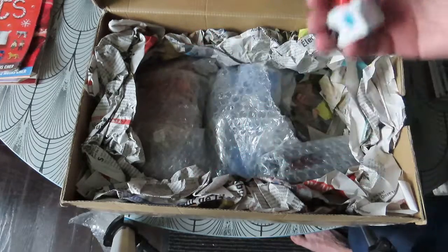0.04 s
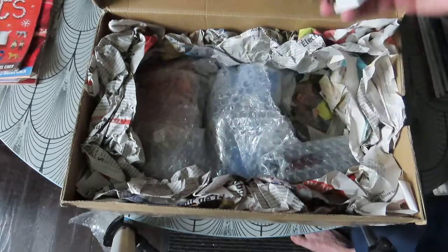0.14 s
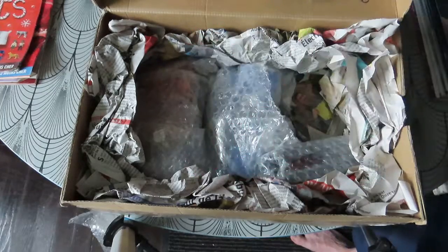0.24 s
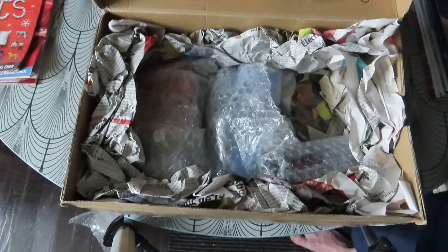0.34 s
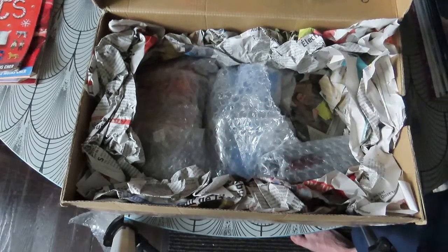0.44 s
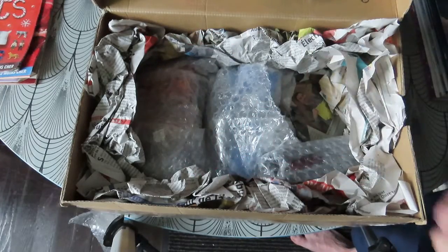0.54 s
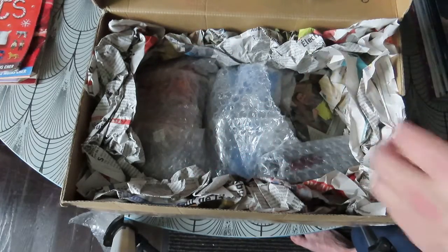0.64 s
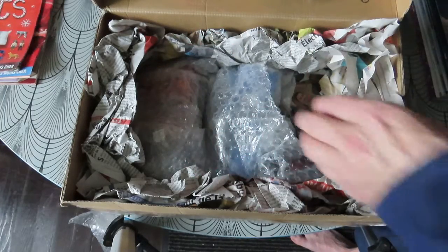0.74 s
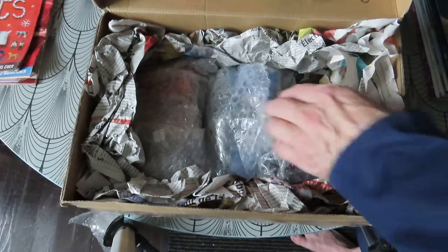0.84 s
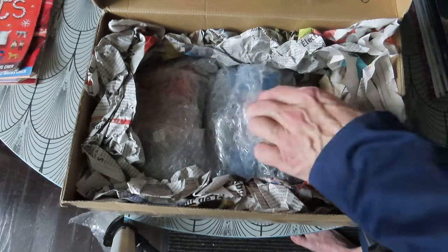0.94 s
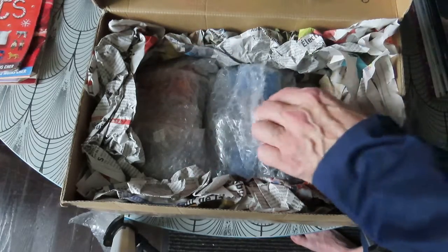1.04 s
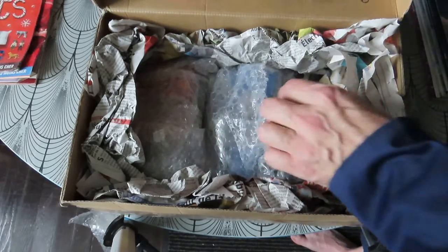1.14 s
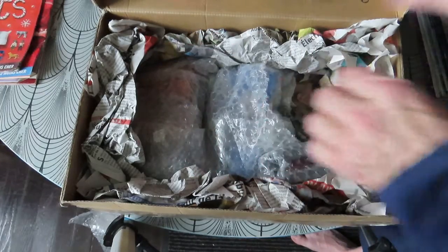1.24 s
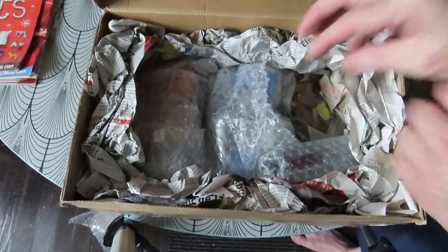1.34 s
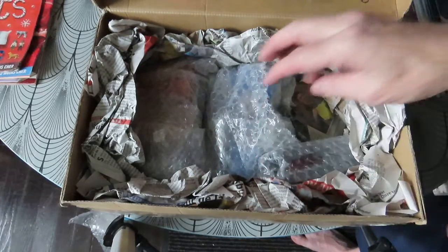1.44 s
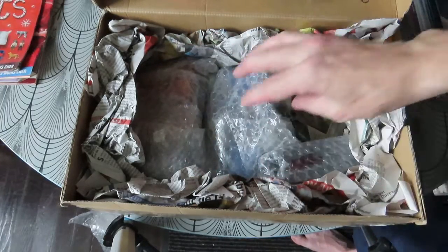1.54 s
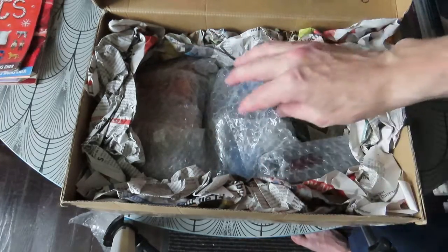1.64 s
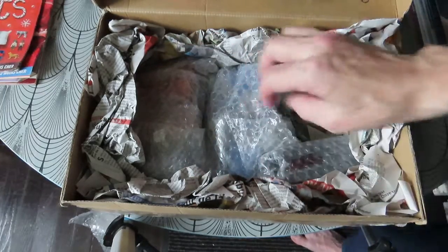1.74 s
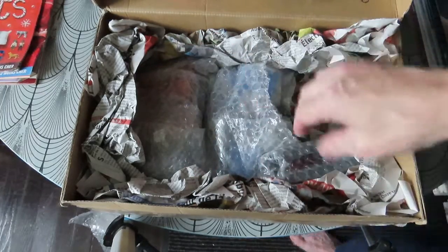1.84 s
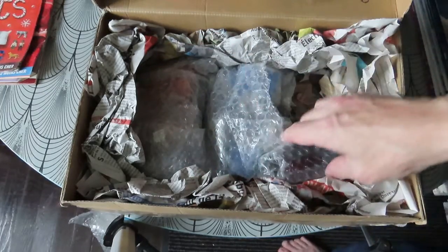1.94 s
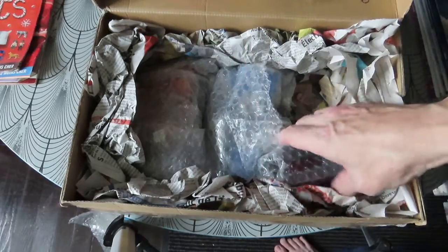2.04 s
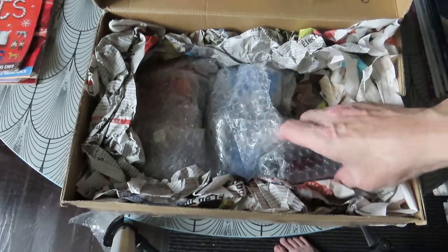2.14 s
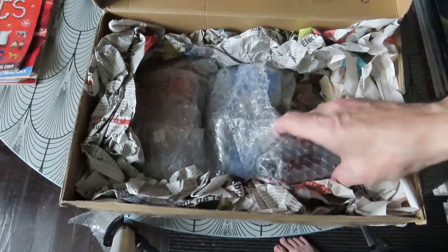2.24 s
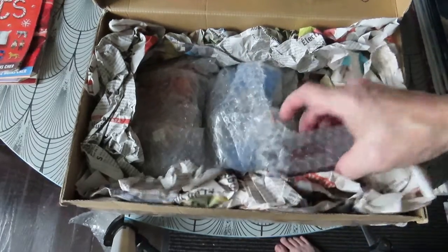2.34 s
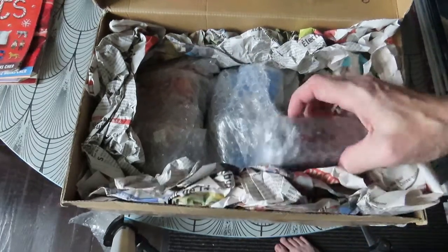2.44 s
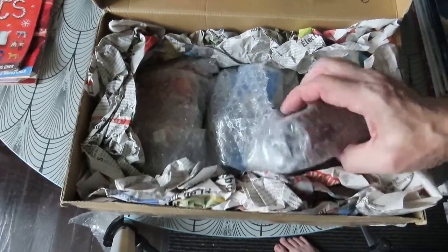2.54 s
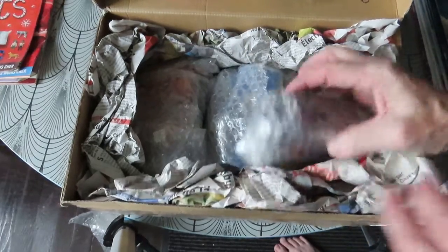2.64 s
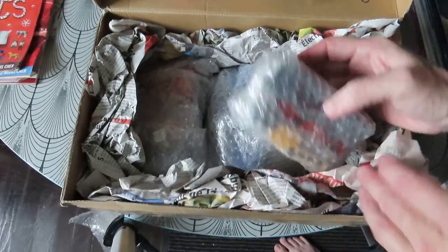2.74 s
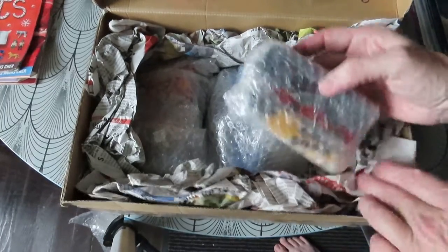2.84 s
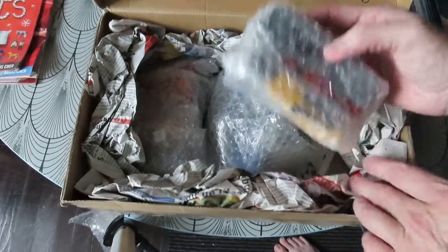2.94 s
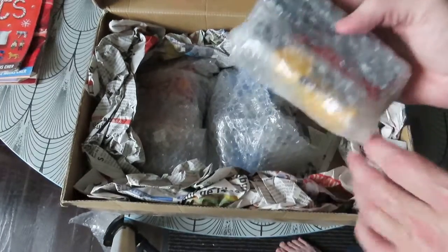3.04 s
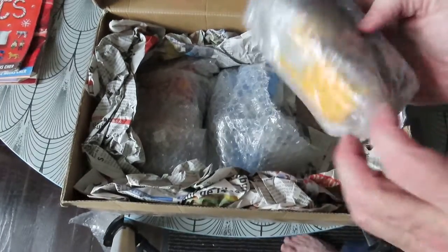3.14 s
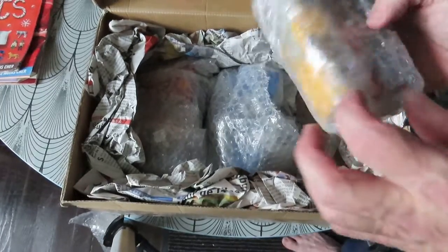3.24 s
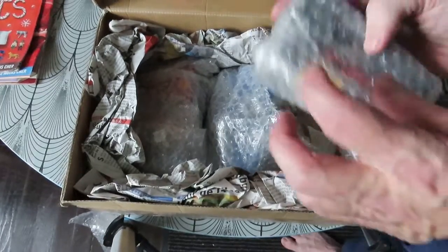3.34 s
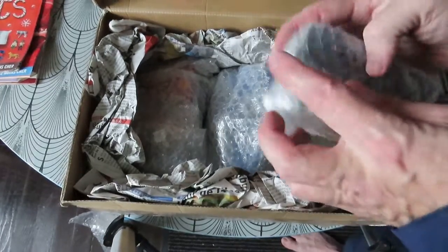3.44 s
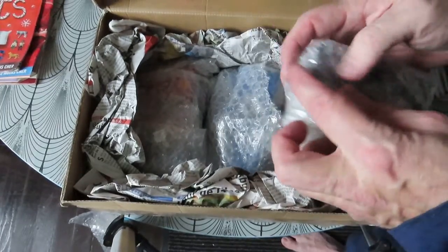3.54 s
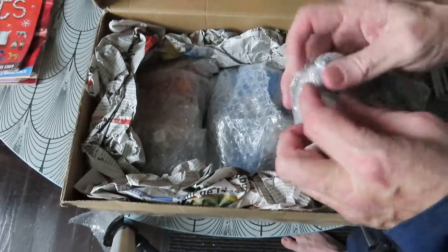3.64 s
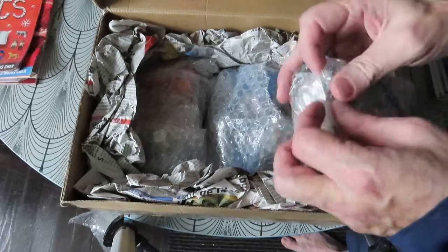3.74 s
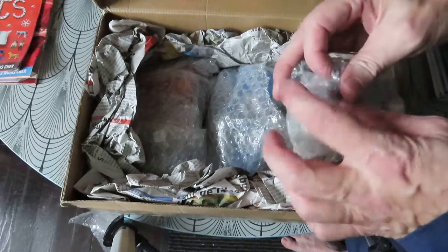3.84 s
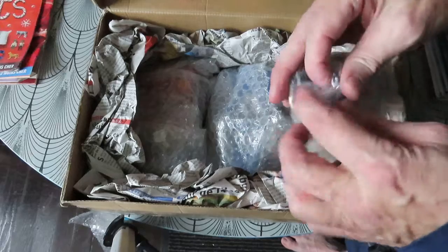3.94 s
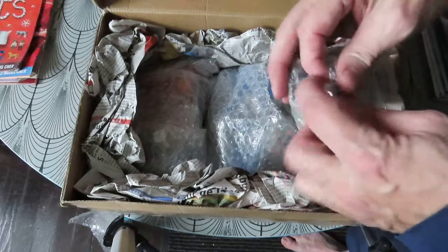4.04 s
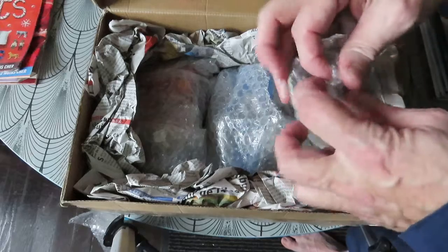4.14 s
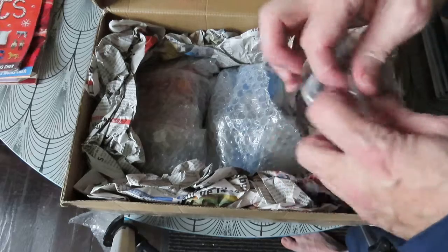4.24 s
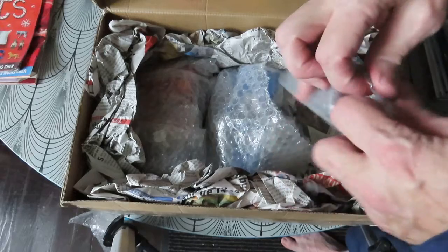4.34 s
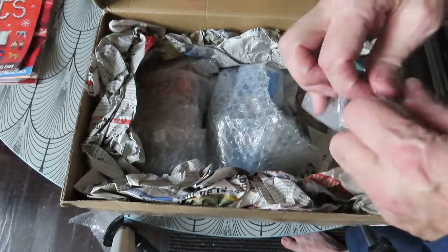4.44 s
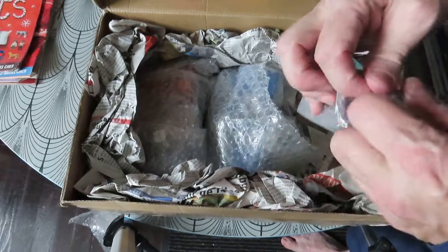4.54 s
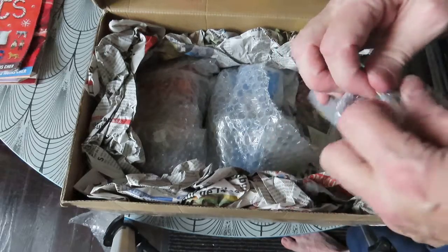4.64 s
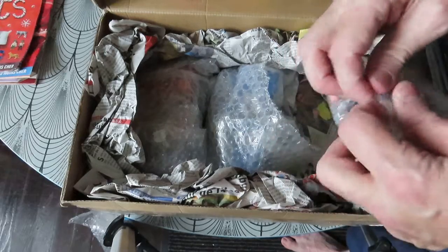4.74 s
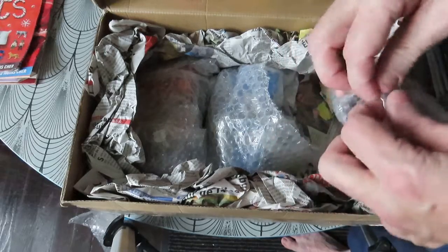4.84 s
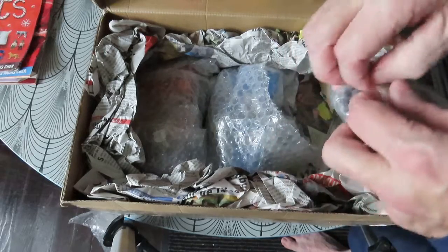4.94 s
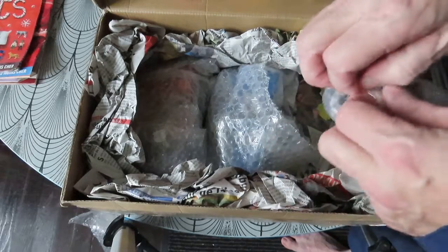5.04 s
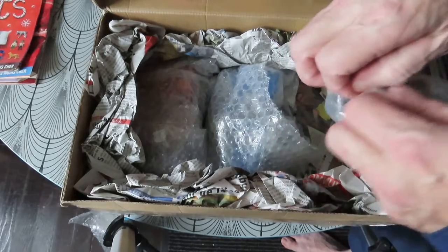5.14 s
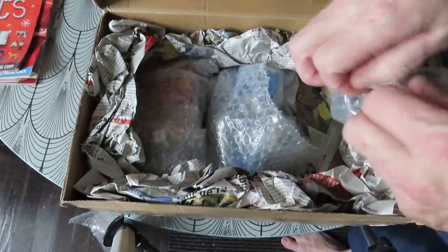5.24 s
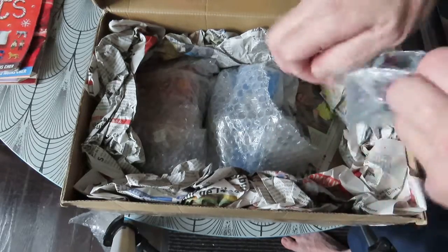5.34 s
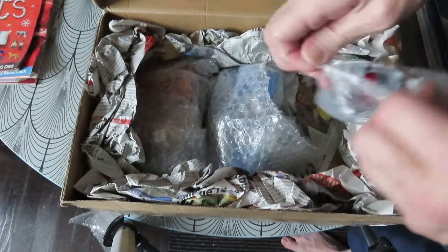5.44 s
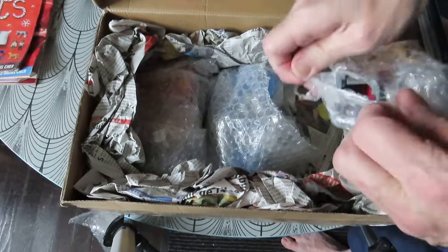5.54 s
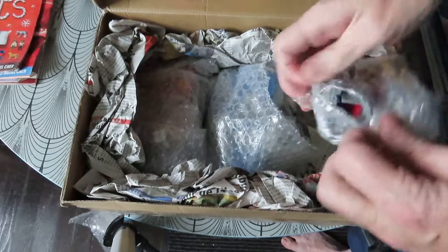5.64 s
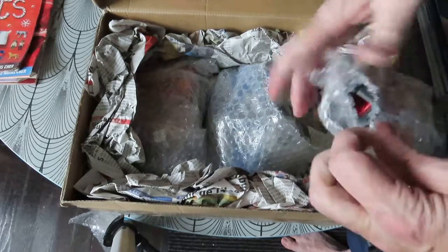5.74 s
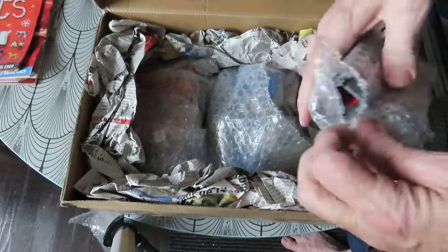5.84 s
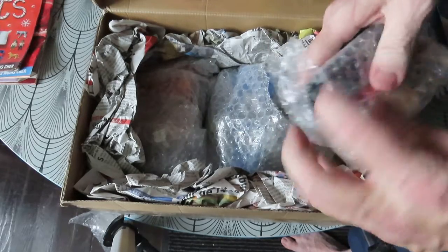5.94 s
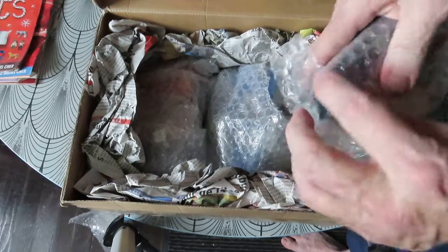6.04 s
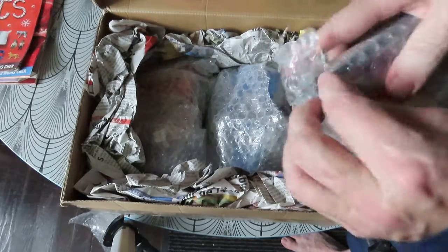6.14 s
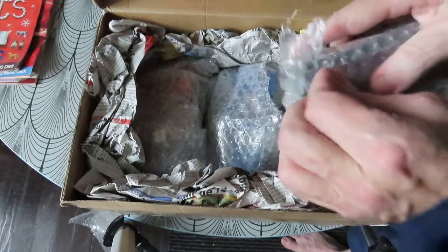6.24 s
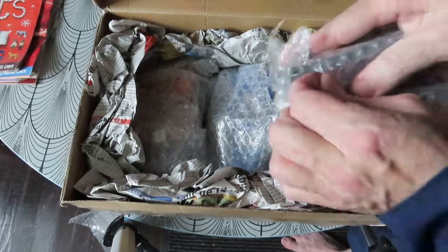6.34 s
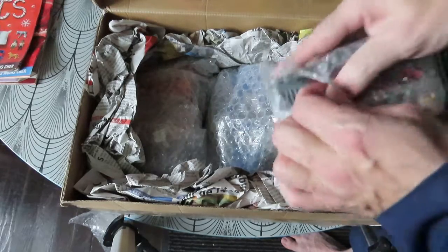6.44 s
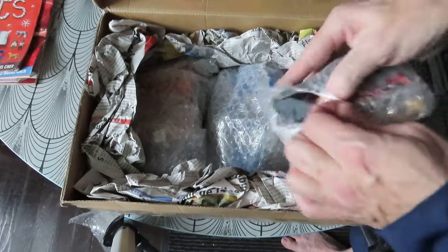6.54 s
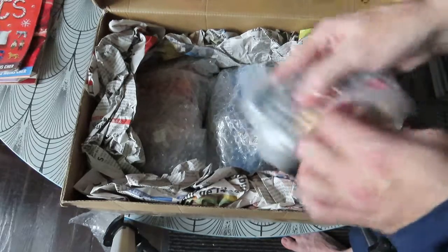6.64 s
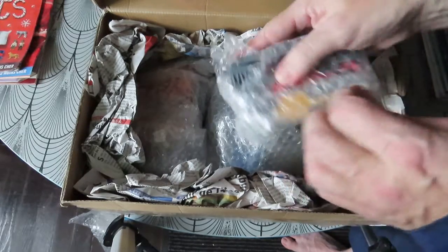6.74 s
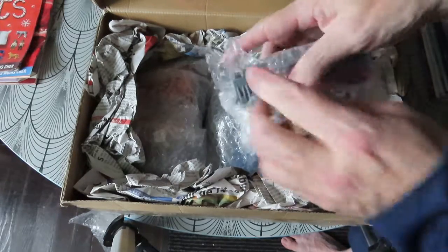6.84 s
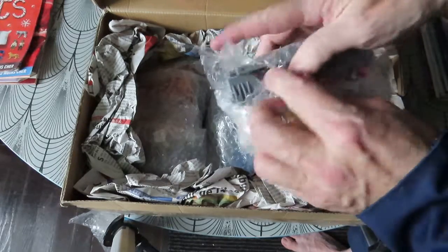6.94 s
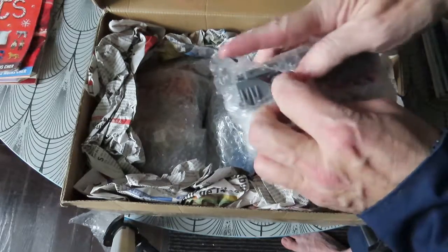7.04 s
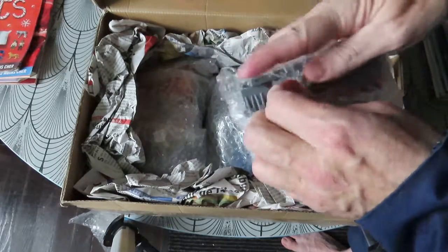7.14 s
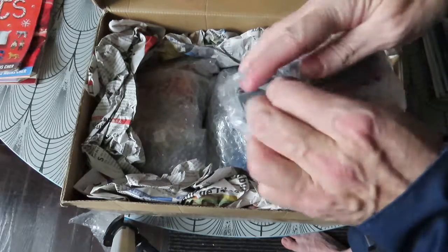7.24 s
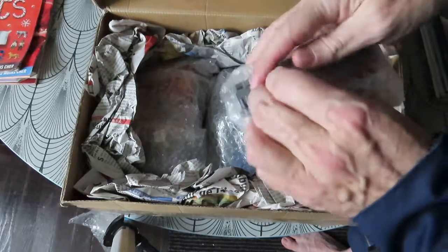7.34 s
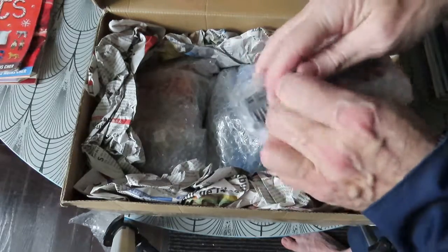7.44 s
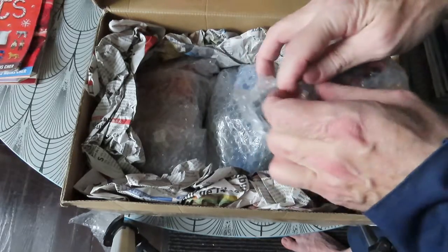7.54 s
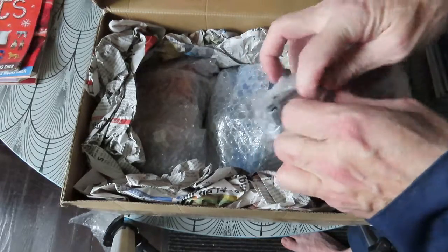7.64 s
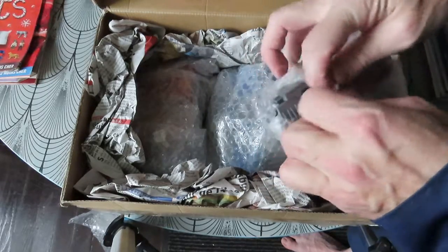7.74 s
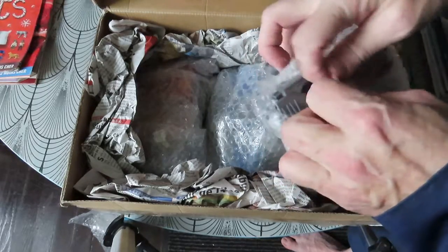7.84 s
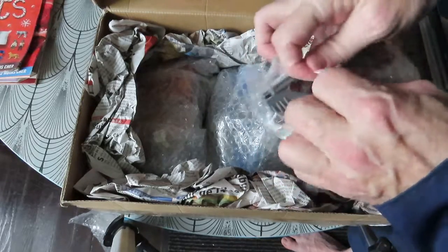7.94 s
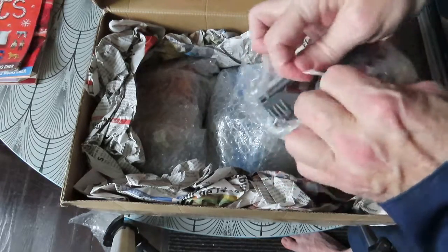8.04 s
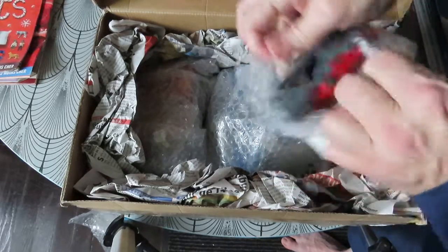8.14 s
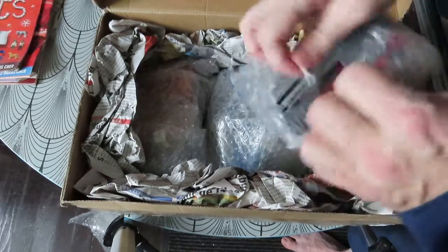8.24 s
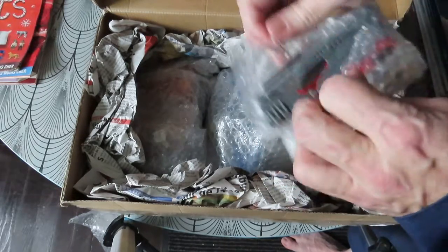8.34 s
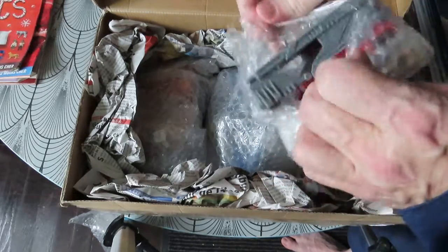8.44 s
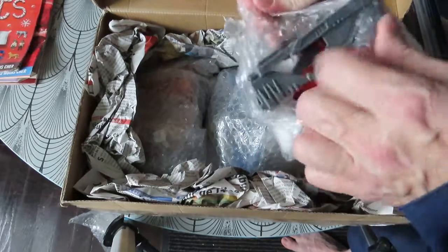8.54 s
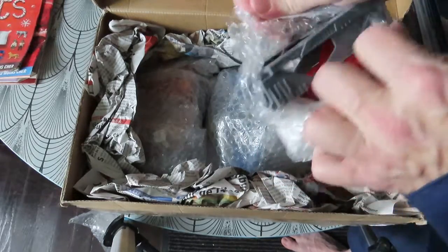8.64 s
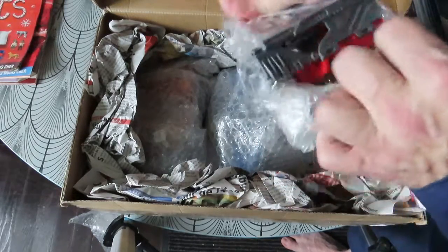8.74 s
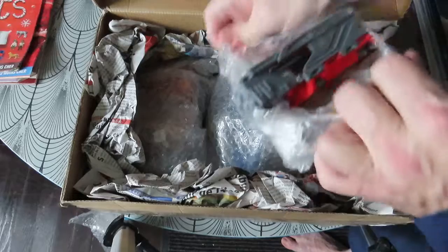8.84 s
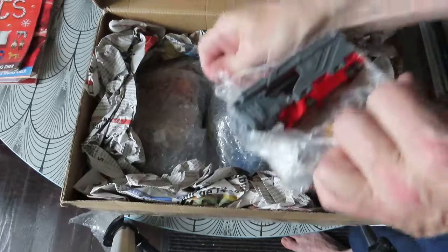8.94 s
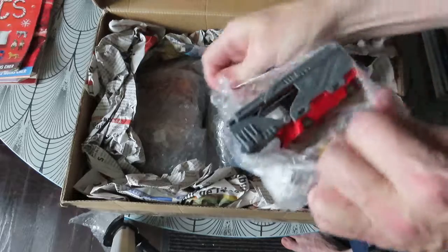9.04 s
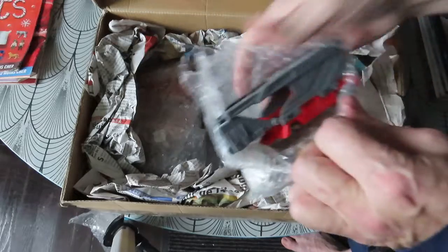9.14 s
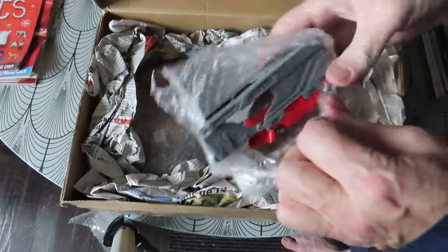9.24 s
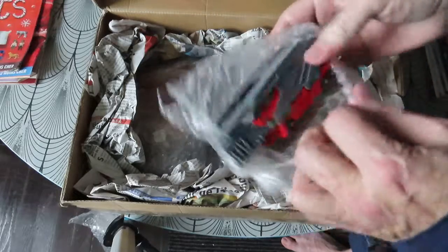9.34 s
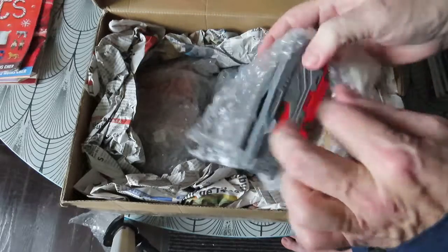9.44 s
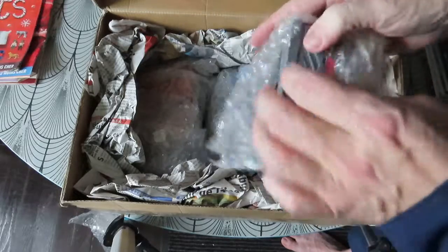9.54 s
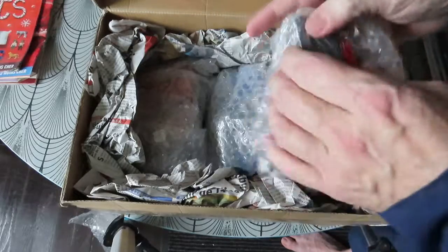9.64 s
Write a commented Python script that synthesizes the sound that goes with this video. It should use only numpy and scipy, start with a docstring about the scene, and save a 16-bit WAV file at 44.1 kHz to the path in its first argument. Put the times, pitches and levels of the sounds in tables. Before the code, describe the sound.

A quiet room hums faintly behind close stereo microphones. From 0.15 to 0.5 s small hard plastic parts clink lightly. At 0.7 to 0.85 s a toy drops on a table: loud, hollow double knocks with sharp clacks, then a brief rustle until about 1.1 s. Near silence follows, with faint ticks around 1.3 s. From 2 s hands dig into paper and bubble wrap, crunching with dull box bumps, strongest at 2.4 to 2.9 s. From 3 to 5 s the parcel is squeezed and picked at in small uneven crackles. At 5.2 s a bubble pops sharply with a hissy puff, and a heavy crunch follows at 5.37 s. Crisp pulls come at 6.4 to 6.7 s, then softer fiddling. Around 8.1 to 8.2 s a cluster of loud snaps and a thump tears the wrap, another bright crack comes at 8.78 s, and rustling continues to the end at almost 10 s.

```python
"""Crumpled paper and bubble wrap rustle and snap as hands dig a parcel out of a box and tear its wrap open.
The rustle is thousands of tiny noise ticks in clumps over a hiss; it swells with squeezes, pulls and impacts.
Snaps ring briefly and crackle, knocks on table, box and parcel are dull low rings, a puff follows one burst.
At the start a toy is dropped on a table and small plastic parts clink: a tick plus a few ringing notes.
A quiet room hums behind; two close microphones stand a little to the left of the hands."""
import sys
import numpy as np
from scipy import signal
from scipy.fft import rfft, irfft
from scipy.io import wavfile
from scipy.ndimage import uniform_filter1d

SR = 44100
rng = np.random.default_rng(int(sys.argv[2]) if len(sys.argv) > 2 else 0)


def wav_out(sig):
    """Save sig, one row per channel (or a flat mono array), as 16-bit PCM at SR to the path in sys.argv[1]."""
    wavfile.write(sys.argv[1], SR, np.round(np.clip(np.atleast_2d(sig).T, -1, 1) * 32767).astype(np.int16))


N = 427769


def gain_of(db):
    """Turns decibels into a factor."""
    return 10 ** (np.asarray(db) / 20)


def evened(x):
    """Scales to an average strength (rms) of 1."""
    return x / np.sqrt(np.mean(x ** 2) + 1e-20)


def smoothed_twice(x, size, axis=-1):
    """A moving average of one width, applied twice."""
    return uniform_filter1d(uniform_filter1d(x, size=size, axis=axis), size=size, axis=axis)


def read(points, hz):
    """Reads a table between its points, on a log-frequency axis."""
    f, value = np.transpose(points)
    return np.interp(np.log(hz + 1), np.log(f + 1), value)


def add(mix, start_s, sound, pan_db, lag):
    """Places a sound; positive pan favours the left, which gets it lag samples later."""
    for channel, side, late in ((mix[0], .5, lag), (mix[1], -.5, 0)):
        part = channel[round(start_s * SR) + late:][:len(sound)]
        part += gain_of(side * pan_db) * sound[:len(part)]


def ring(hz, t60, rise_s):
    """A vibration that starts softly and fades 60 dB in t60 seconds (at least 2 ms), peak 1."""
    t60 = max(t60, .002)
    t = np.arange(round(t60 * SR)) / SR
    fade = gain_of(-60 * t / t60)
    x = np.sin(2 * np.pi * hz * t) * fade * (1 - np.exp(-t / rise_s))
    return x / abs(x).max()


def crack(noise, decay_s, low_hz, high_hz):
    """A short burst of noise, kept to a band of pitches, peak 1."""
    x = noise * np.exp(-np.arange(len(noise)) / SR / decay_s)
    x = signal.lfilter(*signal.butter(2, [low_hz, high_hz], "band", fs=SR), x)
    return x / abs(x).max()


# balance of pitches in the room noise: (frequency [Hz], relative level per Hz [dB])
AIR_COLOUR = [(12, -28), (20, 4), (53, -4.5), (107, 0), (388, -6), (434, 0.5), (485, -7), (558, -3),
              (660, -23), (802, -20), (897, -5.5), (1090, -14), (3950, -21), (13500, -41.5), (16000, -40)]
AIR_DB = -49  # strength of this noise, without the tones
# fuzzy tones in the room: (frequency [Hz], width [Hz], level [dB])
ROOM_TONES = [(555, 13, -61.5), (896, 53, -60.5), (350, 28, -65), (689, 58, -58)]
# how alike left and right are: (frequency [Hz], likeness [0 to 1])
AIR_LIKENESS = [(60, 1), (180, 0.089), (550, 0.53), (1650, 0.24), (4970, 0.46), (15000, 0.34)]


def air():
    """The steady noise of the room: random noise shaped by pitch, with a few fuzzy tones."""
    frames, hz = N // 512 + 5, np.fft.rfftfreq(2048, 1 / SR)
    a, b, c, d = rng.standard_normal((frames, 1025, 4)).T
    left, other = a + 1j * b, c + 1j * d
    same = np.clip(read(AIR_LIKENESS, hz), -1, 1)[:, None]
    z = np.array([left, same * left + np.sqrt(1 - same ** 2) * other])
    wash = gain_of(read(AIR_COLOUR, hz))
    wash *= gain_of(AIR_DB) / np.linalg.norm(wash)
    for tone_hz, width_hz, db in ROOM_TONES:
        bump = np.exp(-((hz - tone_hz) / width_hz) ** 2)
        wash = np.hypot(wash, gain_of(db) * bump / np.linalg.norm(bump))
    # the deep rumble comes and goes
    surge = evened(uniform_filter1d(rng.standard_normal(frames), size=25))
    surge_share = read([(60, 0.61), (200, 0.027)], hz)[:, None]
    z *= gain_of(3.1 * surge * surge_share)
    x = signal.istft(z * wash[:, None], nperseg=2048, noverlap=1536)[1][:, :N]
    return np.linalg.norm(wash) * evened(x)


def rustle(per_s=1100, spread_db=3.5, clump_db=1.5, decay_s=0.0021, hump_db=14.5, lag_spread=0.85, rub=0.68):
    """Countless creases of random size and colour give way in clumps over a rubbing hiss."""
    kinds = 24  # kinds of crease, each with its own colour
    place, size, kind, lag = rng.random((round(per_s * N / SR), 4)).T
    clumps = evened(smoothed_twice(rng.standard_normal(N), 500))
    at = (place * (N - 20)).astype(int) + 10
    rarity = np.minimum(-np.log(size + 1e-9), 5)  # many small creases, few big ones
    size = gain_of(spread_db * rarity + clump_db * clumps[at])
    lag = np.round(lag_spread * np.sqrt(12) * (lag - .5)).astype(int)  # samples: creases lie left and right
    hz, t, out = np.fft.rfftfreq(512, 1 / SR), np.arange(512) / SR, np.zeros((2, N))
    for k, centre_hz in enumerate(np.geomspace(300, 12000, kinds)):
        # finer creases make shorter ticks
        burst = rng.standard_normal(512) * np.exp(-t / decay_s * (centre_hz / 3000) ** 0.82)
        hump = gain_of(hump_db * np.exp(-np.log2((hz + 1) / centre_hz) ** 2))
        burst = irfft(rfft(np.roll(burst, 64)) * hump)
        mine, train = (kind * kinds).astype(int) == k, np.zeros((2, N))
        np.add.at(train[0], at[mine] + lag[mine], size[mine])
        np.add.at(train[1], at[mine], size[mine])
        out += signal.oaconvolve(train, evened(burst)[None], axes=1)[:, 64:N + 64]
    hiss = rng.standard_normal((3, N))  # one shared, plus a little for each side
    hiss = (hiss[0] + 0.12 * hiss[1:]) * gain_of(.5 * clump_db * clumps)
    return evened(out) + rub * evened(hiss)


# slow level of the rustle between swells: (time [s], middle [dB], low end [dB], treble [dB])
SLOW_LEVEL = [(0.0, -61, -54, -66), (0.66, -63.5, -59, -66), (0.9, -40.5, -45, -42),
              (1.18, -47.5, -47, -53), (1.3, -64.5, -60, -65), (1.91, -62.5, -64, -67),
              (1.96, -46.5, -47, -53), (2.4, -39, -43, -47.5), (2.95, -41.5, -42, -47.5),
              (3.09, -52, -51, -55), (3.42, -49.5, -49, -52), (3.75, -45, -49, -47),
              (4.2, -40.5, -57, -45.5), (4.6, -51, -60, -51), (5.15, -53.5, -62, -53), (5.6, -54, -50, -59),
              (6.3, -46.5, -55, -47.5), (6.85, -51.5, -61, -53), (7.5, -48, -57, -49),
              (8.0, -49, -54, -44.5), (8.3, -39.5, -45.5, -38), (8.6, -44, -58, -46.5),
              (9.0, -51, -69, -46), (9.24, -46.5, -62, -50), (9.4, -40.5, -46.5, -42), (9.7, -40, -44, -49)]
# swells of rustle from squeezes, pulls and impacts; fades below 0.01 s count as 0.01 s:
# (peak time [s], time to fade 20 dB [s], effort [dB], weight on box and parcel [dB],
# crispness of the film [dB])
SWELLS = [(0.725, .04, -38, -33, -56), (0.77, 0, -51, -37, -60), (0.833, 0.03, -30.5, -36, -57),
          (0.98, 0.3, -44.5, -39.5, -40), (1.84, -0.03, -50, -39, -73), (1.99, 0.05, -43, -36, -39),
          (2.11, 0.23, -38, -43, -39.5), (2.419, 0.2253, -32.5, -31, -41.5), (2.56, -0.04, -54, -36, -49),
          (2.63, .15, -34.5, -27, -55), (2.71, 0.06, -40, -40, -40), (2.879, .17, -30.5, -28.5, -36),
          (3.02, -0.24, -47, -39, -41), (3.14, 0.2, -45, -44, -44), (3.25, 0.15, -38.5, -47, -41),
          (3.31, 0.1, -45, -62, -46), (3.588, 0.2, -37.5, -43, -37), (3.72, 0.2, -42, -39, -44),
          (3.8, 0.17, -46, -49, -44), (3.87, 0.13, -42.5, -45, -48), (3.95, 0.17, -43, -59, -46),
          (4.06, 0.25, -42.5, -39, -51), (4.24, 0.18, -40, -60, -36.5), (4.29, 0.07, -35.5, -42, -44),
          (4.429, 0.13, -36, -35.5, -34), (4.52, 0.03, -59, -58, -36), (4.68, 0.1, -44, -41, -44),
          (4.79, 0.4, -52, -65, -45.5), (4.84, 0.22, -42, -40.5, -56), (4.99, -0.1, -52, -49, -44),
          (5.1, 0.17, -46, -47.5, -50), (5.21, 0.08, -41, -61, -45), (5.366, 0.0856, -24.5, -29.5, -27),
          (5.48, .15, -45, -56, -38.5), (5.731, 0.17, -42.5, -51, -38.5), (5.88, 0.11, -40.5, -43, -45),
          (5.92, 0.08, -65.5, -49, -47), (5.971, 0.12, -38.5, -45, -42), (6.18, 0.26, -45.5, -48, -49),
          (6.431, 0.11, -31.5, -38.5, -30), (6.579, 0.05, -32, -49, -26), (6.708, 0.0534, -32, -39, -31.5),
          (6.951, 0.37, -43, -50, -41.5), (7.27, 0.28, -41.5, -52, -47.5), (7.43, -0.1, -58, -55, -41.5),
          (7.52, 0.11, -39, -44, -39), (7.639, 0.06, -38, -44, -41), (7.72, .15, -42.5, -62, -46),
          (7.94, 0.03, -39, -49, -34), (8.1, .2, -35.5, -48, -39), (8.21, 0.18, -36, -57, -40),
          (8.64, 0.17, -38, -44, -35.5), (8.778, 0.15, -30, -36, -31), (8.938, 0.1, -38.5, -46, -35),
          (9.12, 0.1, -33.5, -37.5, -35), (9.37, .2, -38.5, -49, -38.5), (9.67, 0.13, -34.5, -38, -36)]
BUILD_SHARE = 0.68  # a swell builds up in this share of its fading time


def levels(t):
    """Each swell builds up and fades over the slow level; gives middle, low end and treble in dB."""
    slow_s, *slow = np.transpose(SLOW_LEVEL)
    peak_s, fade_s, *swell = np.transpose(SWELLS)
    since = (t[:, None] - peak_s) / np.maximum(fade_s, .01)
    shape_db = -20 * np.where(since > 0, since, -since / BUILD_SHARE)
    result = []
    for slow_db, swell_db in zip(slow, swell):
        slow_power = gain_of(2 * np.interp(t, slow_s, slow_db))  # doubled dB give power
        swell_power = gain_of(2 * (swell_db + shape_db)).sum(1)
        result.append(10 * np.log10(slow_power + swell_power))
    return result


# balance of pitches in the rustle: (frequency [Hz], relative level per Hz [dB])
RUSTLE_COLOUR = [(35, -31), (60, 3.5), (251, 7), (391, 7), (754, -2), (1020, 2.5), (2110, 1), (6070, -8.5),
                 (8430, -8), (13500, -11.5), (16200, -21)]


def handled(x):
    """Effort sets the middle, weight the low end and crispness the top of the rustle."""
    hz, t, z = signal.stft(x, SR, nperseg=256, noverlap=192)
    effort_db, weight_db, crisp_db = levels(t)
    # even out the pitches before colouring them
    z /= np.sqrt(uniform_filter1d((abs(z) ** 2).mean((0, 2)), size=5))[:, None]
    low = read([(600, 0.89), (1100, 0.0065)], hz)[:, None]
    high = read([(4000, 0.016), (7000, 0.84)], hz)[:, None]
    level_db = (1 - low - high) * effort_db + low * weight_db + high * crisp_db
    # the colour shifts as other folds rub
    patches = rng.standard_normal((len(t), len(hz))).T
    patches = uniform_filter1d(uniform_filter1d(patches, size=20, axis=1), size=3, axis=0)
    level_db += 2.02 * evened(patches)
    colour = gain_of(read(RUSTLE_COLOUR, hz))
    colour /= np.linalg.norm(colour[(hz > 900) & (hz < 4500)])
    return signal.istft(z * colour[:, None] * gain_of(level_db), SR, nperseg=256, noverlap=192)[1][:, :N]


# small hard parts touching, levels before trims:
# (time [s], level [dB], pitch of the struck part [Hz], tick over that level [dB])
PART_TOUCHES = [(0.1497, -31, 4050, -8), (0.1585, -22.5, 3550, -15), (0.1654, -28, 3560, -5),
                (0.2317, -29.5, 9400, 9.5), (0.2952, -26.5, 3000, -14), (0.4349, -33.5, 3120, -9),
                (0.4544, -38, 2870, -3), (0.4728, -32, 3870, -10), (1.261, -40, 3610, -4),
                (1.3247, -47, 3750, 0), (1.358, -45, 2840, -1)]
# notes the plastic parts can ring at: (frequency [Hz], relative level [dB], time to fade 60 dB [s])
PART_MODES = [(2150, 6, 0.023), (3000, -4.5, 0.013), (3600, -13, 0.083), (7080, -9, 0.044),
              (8400, 1, 0.032), (10000, -8, 0.026), (12900, -4, 0.036)]


def clinks():
    """A tick, and ringing notes that are weaker the further they lie from the struck part's pitch."""
    out = np.zeros((2, N))
    for s, db, struck_hz, tick_db in PART_TOUCHES:
        tick = crack(rng.standard_normal(400), 0.0024, 1600, 11500)
        add(out, s, gain_of(db + tick_db) * tick, 0, 0)
        for hz, mode_db, t60 in PART_MODES:
            away_db = 39.0 * abs(np.log2(hz / struck_hz))  # 39 dB weaker per octave away
            add(out, s, gain_of(db + mode_db - away_db) * ring(hz, t60, 0.00015), 0, 0)
    return out


# dull knocks on table, box and parcel, levels before trims:
# (time [s], level [dB], pitch [Hz], time to fade 60 dB [s])
DULL_KNOCKS = [(0.697, -22.5, 87, 0.12), (0.697, -14, 424, 0.04), (0.708, -7.5, 400, 0.065),
               (0.729, -17, 786, 0.035), (0.734, -16.5, 372, 0.065), (0.765, -16.5, 370, 0.038),
               (0.823, -7, 342, 0.039), (0.851, -22, 352, 0.049), (0.961, -28.5, 218, 0.097),
               (1.016, -24, 355, 0.047), (1.063, -27.5, 350, 0.016), (2.08, -24, 190, 0.023),
               (2.115, -24, 227, 0.018), (2.375, -21, 360, 0.02), (2.451, -21, 222, 0.013),
               (2.515, -28, 412, 0.04), (2.614, -22, 886, 0.052), (2.628, -19, 275, 0.037),
               (2.688, -29, 563, 0.019), (2.774, -23.5, 252, 0.026), (2.848, -22, 220, 0.036),
               (2.882, -22.5, 374, 0.029), (3.707, -18.5, 843, 0.056), (3.88, -29, 450, 0.045),
               (4.034, -25, 630, 0.025), (4.151, -21, 372, 0.012), (4.418, -23.5, 327, 0.039),
               (4.441, -36.5, 80, 0.1), (5.202, -30, 120, 0.017), (5.36, -29, 101, 0.076),
               (5.351, -18.5, 433, 0.042), (5.362, -14.5, 926, 0.028), (5.388, -12, 550, 0.013),
               (5.43, -25.5, 386, 0.021), (5.889, -29, 300, 0.04), (5.977, -30, 444, 0.03),
               (6.408, -27, 488, 0.048), (6.559, -27.5, 545, 0.018), (6.6, -21.5, 434, 0.01),
               (6.7, -19.5, 440, 0.043), (7.494, -34, 242, 0.035), (7.564, -32.5, 364, 0.04),
               (7.651, -23, 406, 0.032), (8.087, -7, 288, 0.02), (8.169, -21.5, 333, 0.021),
               (8.18, -20.5, 996, 0.033), (8.211, -17, 154, 0.037), (8.762, -22.5, 363, 0.032),
               (8.776, -16.5, 910, 0.028), (8.834, -21.5, 850, 0.024), (9.109, -15, 1317, 0.03),
               (9.46, -30, 340, 0.045)]


def knocks():
    """Cardboard and wood answer with a low ring and a rattle of noise around it."""
    out = np.zeros((2, N))
    for s, db, hz, t60 in DULL_KNOCKS:
        rattle = crack(rng.standard_normal(4000), 0.2 * t60, hz / 2, 1.9 * hz)
        add(out, s, gain_of(db - 2.5) * ring(hz, t60, 0.0018), 0, 0)
        add(out, s, gain_of(db - 3.0) * rattle, 0, 0)
    return out


# single creases and bursting bubbles, levels before trims:
# (time [s], level [dB], pitch [Hz], treble crack over that level [dB])
CREASE_SNAPS = [(0.6978, -7, 3150, 2.5), (0.701, -0.5, 1350, -7), (0.7072, -3, 1250, -29),
                (0.7144, -8, 1430, -19), (0.7716, -20, 1090, -23), (0.815, -8, 1240, -17),
                (0.8188, -6.5, 1650, -14), (0.834, -15, 1130, -22), (0.9854, -24, 8710, -5),
                (1.0155, -19, 4340, 5), (2.001, -21.5, 1650, -5.5), (2.0793, -14, 1890, -10),
                (2.1163, -12.5, 3880, -13), (2.1917, -12, 2840, -21), (2.235, -10, 4100, -12),
                (2.3757, -10, 1420, -20), (2.4194, -10.5, 1240, -29), (2.5172, -8, 1320, -24),
                (2.6167, -11, 1020, -32), (2.6242, -11, 860, -24), (2.633, -15, 2760, -20),
                (2.6586, -23, 1380, 0), (2.84, -10.5, 1270, -19), (2.863, -12.5, 1050, -20),
                (2.873, -9.5, 2930, -28), (2.8787, -12, 1790, -22), (2.8983, -14, 2150, -8),
                (3.0229, -15.5, 1870, -3.5), (3.1185, -16, 980, -13), (3.1398, -17, 1170, -2),
                (3.3193, -16, 1060, -11), (3.4003, -24.5, 4500, 6), (3.7087, -26, 900, -14),
                (3.7735, -13.5, 1440, -12), (3.825, -21, 3360, -4), (3.9126, -28.5, 7800, 5),
                (3.9539, -16.5, 1700, -13), (4.017, -15.5, 1510, -7), (4.0587, -21.5, 2650, 3),
                (4.156, -12, 2240, -9), (4.1966, -13, 3120, -8), (4.2467, -18, 2150, 2),
                (4.251, -20, 3600, 3), (4.2818, -12.5, 1390, -8), (4.2918, -15, 1390, -20),
                (4.298, -12, 1060, -18), (4.43, -16, 2170, -4), (4.6037, -30.5, 8160, 8),
                (4.671, -29, 2170, 3), (4.6853, -18, 2220, -8), (5.0224, -19, 2300, -1),
                (5.1076, -22.5, 3050, 1), (5.1817, -19.5, 6200, 1), (5.2015, 7.5, 3150, -14),
                (5.236, -15.5, 2830, -20), (5.3081, -16, 4890, -2), (5.3235, -12, 1000, -16),
                (5.3493, -17.5, 2300, 5), (5.365, -4.5, 2140, -8), (5.368, 0.5, 2100, -19),
                (5.389, -8, 1180, -17), (5.447, -14, 5870, -11), (5.56, -28, 7000, 1),
                (5.747, -17, 4840, -9), (5.8934, -18, 3150, -3), (6.351, -17.5, 1020, -2),
                (6.4067, -14, 1860, -7), (6.411, -13, 1630, -17), (6.44, -19, 3430, -24),
                (6.461, -17.5, 1660, -7), (6.5514, -14, 1850, 2), (6.601, 1, 2150, -8),
                (6.699, -12, 6200, 0), (6.707, -15, 910, -3), (6.71, -19, 855, -9),
                (6.8197, -25.5, 7700, 1.5), (6.9993, -16, 1670, -13), (7.0128, -22.5, 1120, 2.5),
                (7.495, -21, 1280, -10), (7.566, -15.5, 7900, -1), (7.616, -14.5, 6900, 1),
                (7.7404, -19, 2350, -18), (7.79, -20, 8400, -7), (7.8762, -19, 1420, 5.5),
                (8.0704, -14, 8600, -2), (8.0829, -16, 1270, -27), (8.0878, 2, 1200, -15),
                (8.0898, 3, 1290, -17), (8.0995, -12, 1060, -3), (8.131, -4.5, 1880, -6.5),
                (8.139, -4, 1660, -10), (8.1685, -8.5, 1930, -4), (8.1817, -4, 2720, -7.5),
                (8.1955, -9, 2030, -18), (8.212, 0, 1730, -15), (8.216, -8, 1200, -11),
                (8.2953, -19, 1170, -26), (8.533, -17.5, 1830, -5), (8.5447, -18.5, 8250, -3),
                (8.7324, -10.5, 1230, -8), (8.779, 0.5, 7960, -3), (8.7832, 1, 2710, -7),
                (8.794, -4, 1350, -5), (8.8373, -13, 2500, -12), (8.9262, -18, 1420, 4),
                (8.9441, -23, 7000, 3), (9.1105, -9, 1330, -28), (9.1693, -18, 1200, -11),
                (9.294, -10.5, 1720, -11), (9.355, -15, 2900, -17), (9.477, -24.5, 2730, 4.5),
                (9.5605, -18, 6660, -11)]
# base time [s] at 1 kHz; higher snaps die sooner by this power of pitch
SNAP_BASE_S, SNAP_SHORTENING = 0.0097, 0.54


def snaps(pan_db=-1.5):
    """A few cycles of ringing film, a broad crunch around that pitch and a crack of treble."""
    out = np.zeros((2, N))
    for s, db, hz, crack_db in CREASE_SNAPS:
        base_s = SNAP_BASE_S * (1000 / hz) ** SNAP_SHORTENING
        noise = rng.standard_normal((2, 1000))
        lag = rng.integers(0, 2) * (db < -12)  # small ones scatter further right
        crunch = crack(noise[0], 0.4 * base_s, 0.33 * hz, min(2.35 * hz, 15000))
        treble = crack(noise[1], 0.00092, 3300, 13800)
        add(out, s, gain_of(db - 6.5) * ring(hz, 0.83 * base_s, .00015), pan_db, lag)
        add(out, s, gain_of(db - 9.5) * crunch, pan_db, lag)
        add(out, s, gain_of(db + crack_db + 0.5) * treble, pan_db, lag)
    return out


def puff(start_s=5.204, peak_db=-22.5, low_hz=2500, high_hz=7000, decay_s=0.058):
    """Air and torn film after the largest bubble bursts: a band of hiss that dies away."""
    out = np.zeros((2, N))
    hiss = crack(rng.standard_normal(9000), decay_s, low_hz, high_hz)
    add(out, start_s, gain_of(peak_db) * hiss, 0, 0)
    return out


# how long echoes last: (frequency [Hz], time to fade 60 dB [s])
ECHO_FADE = [(100, 0.11), (500, 0.23), (2000, 0.15), (5000, 0.27), (14000, 0.12)]


def room(x):
    """Sparse echoes of random sign from 6 ms on, each band dying at its own speed."""
    taps = np.zeros((3, SR // 2))
    at = np.arange(280, SR // 2 - 20, 20) + rng.integers(0, 20, (3, (SR // 2 - 281) // 20))
    np.put_along_axis(taps, at, rng.choice([-1., 1.], at.shape), 1)
    taps = taps[0] + 0.076 * taps[1:]  # close microphones share most echoes
    hz, t, z = signal.stft(taps, SR, nperseg=128)
    fade = gain_of(-60 * t / read(ECHO_FADE, hz)[:, None])
    tail = signal.istft(z * fade, SR, nperseg=128)[1]
    return signal.fftconvolve(x[None], tail / np.linalg.norm(tail[0]), axes=1)[:, :N]


def scene():
    """Hands and their echoes over the room noise."""
    rustling = handled(rustle()) * gain_of([[-.4], [.4]])  # a touch louder on the right
    hands = rustling + clinks() + knocks() + snaps() + puff()
    return hands + gain_of(-13.5) * room(hands.mean(0)) + air()


def record(dry):
    """The left microphone hears everything 21 microseconds late; peaks over full scale clip; band limits."""
    hz = np.fft.rfftfreq(N + 1, 1 / SR)
    late = irfft(rfft(dry[0], N + 1) * np.exp(-2j * np.pi * hz * 2.1e-5), N + 1)[:N]
    no_rumble = signal.lfilter(*signal.butter(3, 38., "high", fs=SR), [late, dry[1]])
    clipped = np.clip(no_rumble, -1, 1)
    treble_limit = signal.firwin(255, 16200, window=("kaiser", 9), fs=SR)  # Hz
    return signal.oaconvolve(clipped, treble_limit[None], "same")


dry = scene()
out = record(dry)
wav_out(out)
```